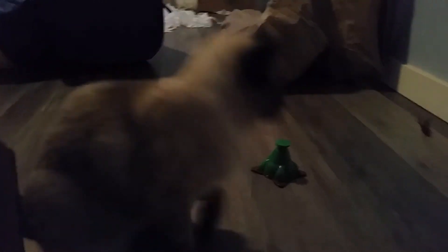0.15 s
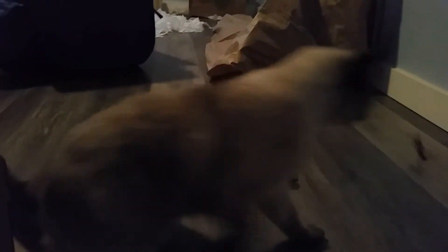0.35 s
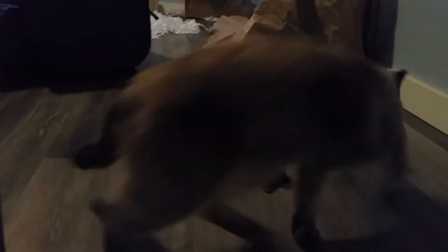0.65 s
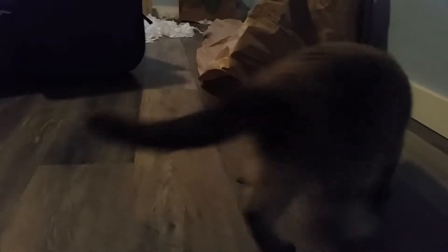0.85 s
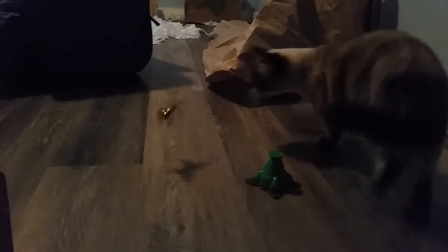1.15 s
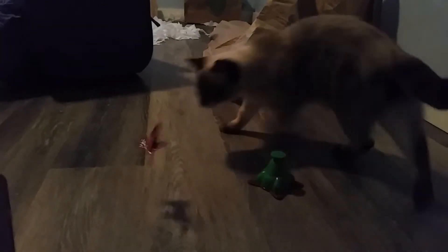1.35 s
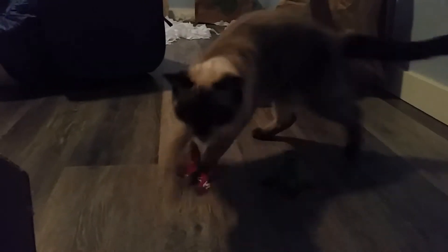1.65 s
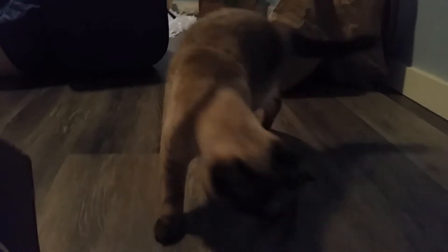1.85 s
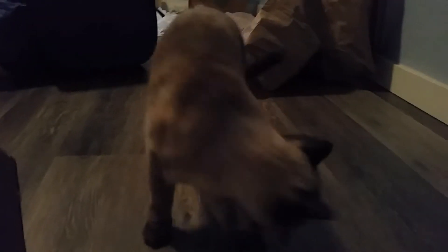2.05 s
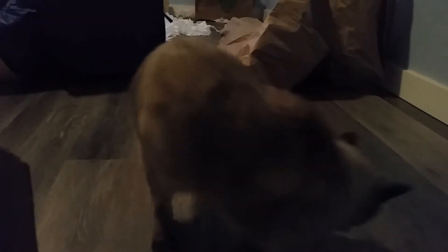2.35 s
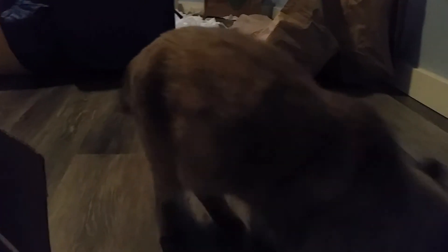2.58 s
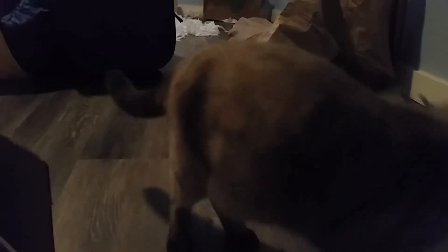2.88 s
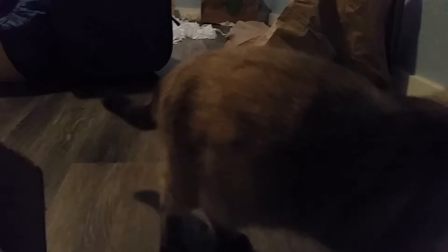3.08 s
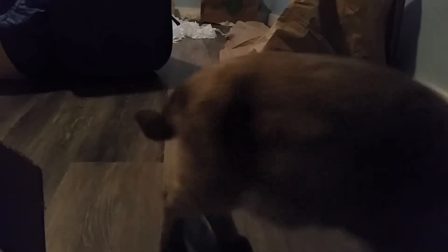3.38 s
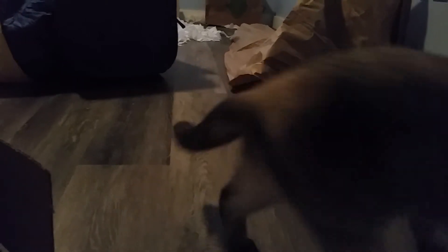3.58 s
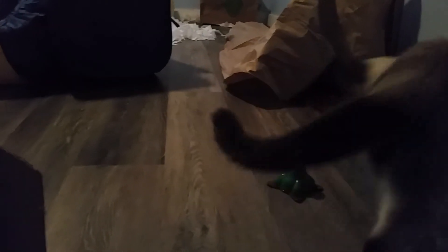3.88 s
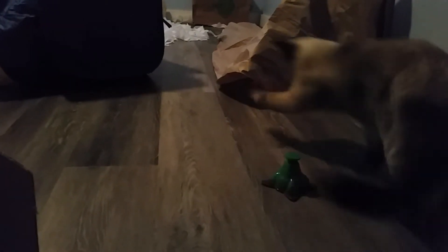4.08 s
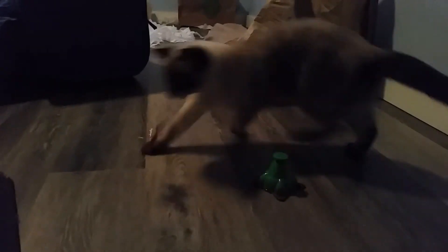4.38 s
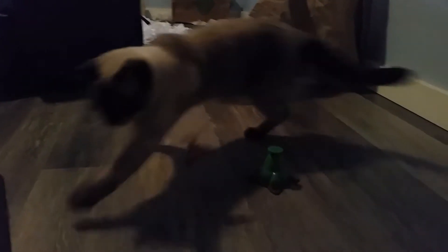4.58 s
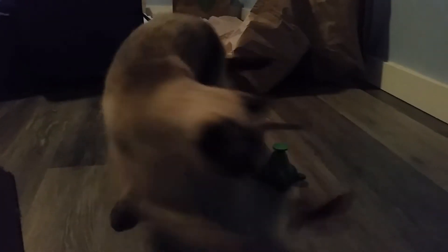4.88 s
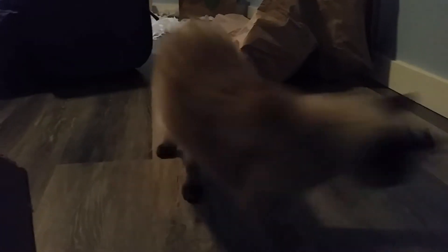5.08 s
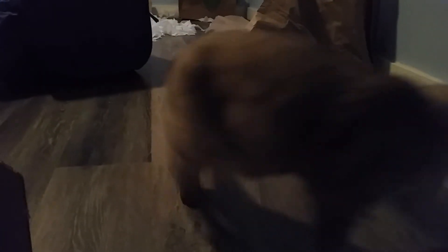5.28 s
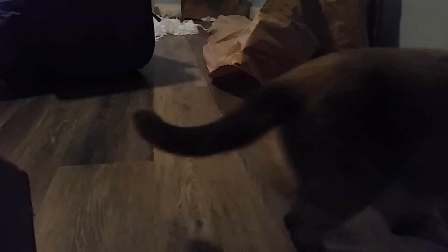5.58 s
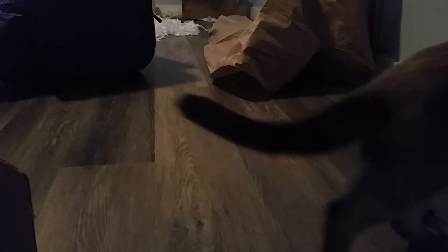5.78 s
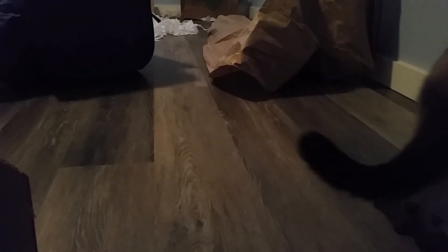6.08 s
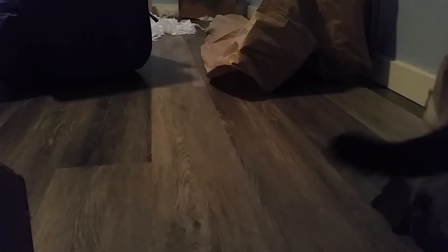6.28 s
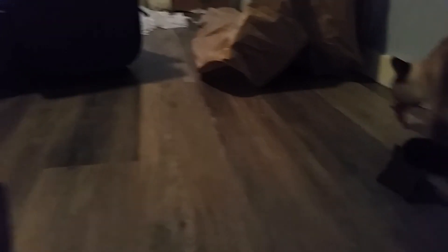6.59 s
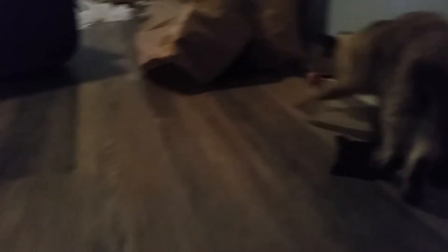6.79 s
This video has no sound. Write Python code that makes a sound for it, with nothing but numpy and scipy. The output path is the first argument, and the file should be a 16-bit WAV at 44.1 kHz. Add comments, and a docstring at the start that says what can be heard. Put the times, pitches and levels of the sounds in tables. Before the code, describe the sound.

Close hand-held stereo pickup of a cat playing indoors on hard boards. A tiny paw squeak and toy rustle come first, then scattered crisp bats and clicks of claws, with quieter shuffling between. A burst of cracking, buckling paper is the loudest event, ringing in the room; a few taps, paper scraping, lens clicks and dull bumps on the camera body end it.

```python
"""Bare, ringing room with a wooden floor: a cat chases a crinkly toy, then pounces into paper bags and pushes along them.
Toy and paper are runs of tiny random snaps through filters; claws and pads are decaying noise bursts; a paw squeaks.
A hand-held camera adds finger bumps (gliding low tones) and lens motor ticks (short pings) over a buzzing mount.
Shaped noise is the room air, a wavering sine the faint hum of an appliance; loud passages turn the gain down."""
import sys
import numpy as np
from scipy import signal
from scipy.fft import rfft, irfft, next_fast_len
from scipy.io import wavfile
from scipy.ndimage import uniform_filter1d, minimum_filter1d, map_coordinates

SR = 44100
rng = np.random.default_rng(int(sys.argv[2]) if len(sys.argv) > 2 else 0)


def master_out(mix):
    """Clip the mix to full scale and print it as 16-bit PCM to the path in sys.argv[1]."""
    frames = np.transpose(np.atleast_2d(mix))
    ceiling = np.clip(frames, -1, 1)
    pcm = np.round(ceiling * 32767).astype(np.int16)
    wavfile.write(sys.argv[1], SR, pcm)


N = 306054

# Levels in the event tables are relative; each source trims them. claws tick on the boards: (time [s], level
# [dB], wood trim [dB])
CLAW_TICKS = [(0.4108, -34, -8), (0.5764, -21.5, -8), (1.6926, -37.5, -6), (1.783, -23, -8),
              (1.8494, -15, -13), (2.188, -24, -13.5), (4.4423, -27.5, -2), (4.7468, -19.5, -25),
              (4.8051, -36.5, 5), (4.8463, -21.5, 2), (5.009, -30, -13), (5.3498, -19, -14),
              (5.4177, -9, -2), (6.1364, -26.5, -19)]
# the toy is batted: (time [s], level [dB], wood level relative to it [dB], length [s])
TOY_BATS = [(.562, -19.5, -7, 0.0075), (.621, -22, -7.5, 0.016), (1.859, -9, -11.5, 0.0082),
            (2.221, -18, -13, .012), (2.511, -26, -7.5, 0.012), (3.229, -26.5, -6, 0.027),
            (4.754, -29.5, -20, .019), (5.322, -27.5, -10, 0.036), (5.349, -10, -16, .03),
            (5.583, -13.5, -9, 0.024), (5.656, -25, -23, 0.11), (6.223, -24.5, 2, 0.018),
            (6.253, -19, -2, 0.014), (6.357, -20.5, -5.5, 0.023)]
# blows on the bags, toy under the paws: (time [s], paper level [dB], toy level [dB], length [s])
BAG_BLOWS = [(5.235, -22, -26, 0.02), (5.358, -5, -31, 0.0069), (5.417, -2, -4, 0.0092),
             (5.453, -2, -5.5, 0.0096), (5.464, -3.5, -19, 0.0086), (6.511, -10, -38, .012)]
# fingers bump the camera body: (time [s], level [dB])
FINGER_BUMPS = [(1.247, -19), (4.137, -37), (4.145, -25.5), (4.315, -28.5), (4.346, -19.5), (4.414, -28),
                (4.506, -19), (6.673, -19.5), (6.724, -14), (6.744, -13.5), (6.765, -15.5), (6.791, -15)]
# runs of lens motor steps: (start [s], end [s], mid-run level [dB])
MOTOR_RUNS = [(.047, 0.679, -46), (0.931, 1.457, -48), (1.47, 1.837, -52), (2.342, 2.604, -48.5),
              (2.789, 3.244, -46), (3.457, 3.755, -45), (4.086, 4.471, -45.5), (4.54, 4.943, -52),
              (5.001, 5.31, -49)]
# harder jolts of the lens: (time [s], level [dB])
MOTOR_JOLTS = [(.336, -39), (2.341, -38.5), (2.388, -33.5), (2.915, -31), (3.033, -35), (3.113, -34),
               (3.581, -28.5), (4.292, -38), (4.823, -32.5), (5.24, -24.5), (6.517, -15), (6.584, -23),
               (6.651, -14.5), (6.699, -19), (6.751, -12), (6.857, -17), (6.928, -19)]
# a paw pad squeaks on the boards: (time [s], pitch [Hz], level [dB])
PAD_SQUEAK = [(.18, 1188, -62), (.195, 1200, -46), (.23, 1405, -45.5), (.25, 1646, -47), (.28, 1716, -52),
              (.295, 1740, -73)]
# soft pads land on the boards: (time [s], level [dB])
PAD_LANDINGS = [(2.027, -40.5), (2.118, -39), (2.139, -42.5), (2.22, -40.5), (2.543, -39.5), (3.736, -37.5),
                (3.882, -38.5), (4.213, -33), (4.577, -33.5), (4.732, -39), (5.037, -34.5)]
# the toy skids over the boards: (time [s], level [dB], length [s])
TOY_SKIDS = [(.492, -27, 0.0066), (0.517, -37, 0.028), (0.986, -39, 0.022), (1.767, -32, 0.0082),
             (3.052, -36.5, 0.052), (4.441, -30.5, 0.0072), (4.608, -33, 0.018), (4.804, -27.5, 0.0032),
             (5.199, -31.5, 0.018)]
# the cat sweeps the toy over the floor: (start [s], end [s], toy rustle level [dB], paw scuff level [dB])
FLOOR_SWIPES = [(0.0, .54, -51.5, -55), (.56, .65, -42, -41), (.98, 1.76, -56, -53), (2.22, 2.52, -32, -48),
                (2.7, 3.0, -49, -46), (3.0, 3.17, -48, -45), (3.54, 3.7, -43.5, -45.5),
                (4.08, 4.43, -46.5, -50), (4.52, 4.88, -44.5, -49), (5.14, 5.3, -42.5, -41.5)]
# the cat pushes along the bags: (start [s], end [s], toy rustle level [dB], paper level [dB])
BAG_SHOVES = [(6.24, 6.37, -33, -55), (6.385, 6.53, -37.5, -26.5), (6.54, 6.93, -40, -30.5)]

# modes of the bags and floor: (frequency [Hz], width [Hz], level [dB])
HOLLOW_MODES = [(550, 85, -2.5), (840, 58, 4), (1125, 58, 2.5), (1550, 72, -19), (1930, 69, -15),
                (2420, 46, -1.5)]
# modes of the toy's light shell: (frequency [Hz], width [Hz], level [dB])
SHELL_MODES = [(1840, 400, -0.5), (2510, 410, -2.5), (3000, 590, -5.5)]
# spectrum of the foil and claw ticks: (frequency [Hz], relative density [dB])
TOY_SPECTRUM = [(300, -20), (2000, -17.5), (4000, -12.5), (7500, -13.5), (9500, -1), (11000, 3),
                (13500, -4.5), (16000, -0.5)]
# spectrum of the boards: (frequency [Hz], relative density [dB])
WOOD_SPECTRUM = [(100, -19), (300, -5), (600, 1.5), (1100, 0.5), (2500, -1.5), (3500, -8.5), (7000, -14.5),
                 (16000, -8)]
# spectrum of struck paper: (frequency [Hz], relative density [dB])
PAPER_SPECTRUM = [(80, -44), (150, -23.5), (300, -18.5), (420, -7.5), (560, -4.5), (700, -9), (880, -1.5),
                  (1400, -2.5), (1950, -2.5), (2600, -4.5), (3300, -14.5), (4200, -19.5), (7800, -25.5),
                  (12000, -32)]
# spectrum of scraped paper: (frequency [Hz], relative density [dB])
SCRAPE_SPECTRUM = [(150, -15), (300, -15.5), (530, -6), (690, -11), (850, -1), (1200, -8.5), (1600, -9),
                   (2550, -8.5), (3100, -17), (4000, -20), (6900, -29.5), (12000, -43)]
# spectrum of a pad landing: (frequency [Hz], relative density [dB])
PAD_SPECTRUM = [(60, -1), (250, -8), (600, 0), (1200, -6.5), (2000, -28), (8000, -27)]
# spectrum of the room air: (frequency [Hz], relative density [dB])
AIR_SPECTRUM = [(24, -27), (54, 4), (70, 1.5), (100, -1.5), (150, -5.5), (210, -3), (320, -12), (540, -8.5),
                (1150, -17.5), (2600, -19), (3300, -25.5), (5000, -24), (7800, -36), (9300, -28),
                (10300, -16), (16000, -25)]
# correlation of the two microphone ports, capped in use: (frequency [Hz], correlation [1])
PORT_CORRELATION = [(40, 0.99), (130, 0.9), (300, 0.86), (640, 0.82), (1400, 0), (3000, 0.022)]
# colour of the ports: (frequency [Hz], left minus right [dB])
PORT_TILT = [(100, 0), (700, -3), (1300, -4), (2400, -5), (3200, 1.5), (4400, 7.5), (6300, 4), (8300, -9.5),
             (10500, -13), (12500, 2), (15000, 2)]
# reverberation of the room: (frequency [Hz], T60 [s])
ROOM_T60 = [(150, 0.72), (600, 0.56), (2000, 0.65), (5000, 0.56), (11000, 0.36), (16000, 0.22)]

AIR_DB, TOP_HZ = -48, 16000
# the struck bag goes on buckling, ever more weakly
COLLAPSE_START_S, COLLAPSE_END_S, COLLAPSE_DB, COLLAPSE_FADE_DB_PER_S = 5.494, 5.607, -5, 52
BUCKLE_GAP_S, BUCKLE_LENGTH_S, BUCKLE_TOY_DB = 0.018, 0.0097, -13.5
STROKE_ATTACK_S, STROKE_SAG_DB_PER_S, STROKE_RELEASE_S = 0.027, 3, 0.015
LENS_STEP_S = 0.0411  # a weaker step falls halfway between
LENS_EDGE_DB = -6  # ends of a run relative to its middle
LENS_IDLE_DB = -57  # mount buzz between runs, before its trim
LENS_PAN_DB = 7.5  # left minus right: the lens sits nearer the left port
SWING_START_S, SWING_ATTACK_S, SWING_DB = 6.376, 0.0069, -29
DUCK_ABOVE_DB, DUCK_MAX_DB, DUCK_HOLD_S, DUCK_GLIDE_S = -23.5, 3, 0.7, 0.043


def amp(db):
    """Decibels to gain."""
    return 10 ** (np.asarray(db) / 20)


def unit(x):
    """Scale to rms 1."""
    return x / np.sqrt(np.mean(x ** 2) + 1e-20)


def along(points, hz):
    """(Hz, value) points read on a log frequency axis."""
    f, v = np.transpose(points)
    return np.interp(np.log(hz + 1), np.log(f), v)


def gains(rows):
    """Each dB column as a gain per sample, -120 dB outside the curve."""
    s, *cols = np.transpose(rows)
    t = np.arange(N) / SR
    return [amp(np.interp(t, s, c, left=-120, right=-120)) for c in cols]


def wobble(rate_hz):
    """Smooth random curve with rate_hz knots a second."""
    knots = rng.standard_normal(int(N * rate_hz / SR) + 4)
    return map_coordinates(knots, [np.arange(N) * rate_hz / SR])


def add(track, s, sound):
    """Mix a sound into a track at time s."""
    start = max(round(s * SR), 0)
    part = track[start:start + len(sound)]
    part += sound[:len(part)]


def filtered(x, response):
    """Apply a complex response of frequency to x."""
    m = next_fast_len(N + SR // 2)
    return irfft(rfft(x, m) * response(np.fft.rfftfreq(m, 1 / SR)), m)[..., :N]


def coloured(x, spectrum, size=4096):
    """Minimum-phase filter of unit energy with the given spectrum."""
    cepstrum = irfft(np.log(amp(along(spectrum, np.fft.rfftfreq(size, 1 / SR)))))
    cepstrum[1:size // 2] *= 2
    cepstrum[size // 2 + 1:] = 0
    kernel = irfft(np.exp(rfft(cepstrum)))
    return signal.fftconvolve(x, kernel / np.linalg.norm(kernel))[:N]


def resonance(f, hz, width_hz):
    """Response of one damped mode."""
    return 1j * f * width_hz / (hz * hz - f * f + 1j * f * width_hz)


def modes(f, rows, sign=1):
    """Sum of damped modes; sign -1 alternates their polarity."""
    return sum(sign ** k * amp(db) * resonance(f, hz, width) for k, (hz, width, db) in enumerate(rows))


def at_ports(pair):
    """Two unrelated signals become left and right, most alike in the bass."""
    def mid_side(f):
        turn = np.arccos(np.clip(along(PORT_CORRELATION, f), 0, 0.97)) / 2
        return np.array([np.cos(turn), np.sin(turn)])
    mid, side = filtered(pair, mid_side)
    return np.array([mid + side, mid - side])


def creases(rate_hz, spread_db):
    """Tiny snaps at random times with random signs and sizes, rms 1."""
    sizes = rng.choice([-1, 1], N) * amp(spread_db * np.clip(rng.standard_normal(N), -2, 2))
    return unit(sizes * (rng.random(N) < rate_hz / SR))


def burst(snaps, s, length_s):
    """A run of snaps that starts at once and gives out along a half-Gaussian."""
    t = np.arange(SR // 5) / SR
    shape = np.exp(-(t / max(length_s, 0.002)) ** 2)
    run = np.roll(snaps, -round(s * SR))[:len(t)] * shape
    return run * np.linalg.norm(shape) / (np.linalg.norm(run) + 1e-9)


def strokes(rows):
    """One gain per sample for each dB column: every paw stroke builds up, slackens and dies away."""
    t, total = np.arange(N) / SR, 0
    for start, end, *levels in rows:
        rise = np.clip((t - start) / STROKE_ATTACK_S, 0, 1)
        sag = amp(-STROKE_SAG_DB_PER_S * np.maximum(t - start, 0))
        release = np.exp(-np.maximum(t - end, 0) / STROKE_RELEASE_S)
        total = total + np.outer(amp(levels), rise * sag * release)
    return total


def bag_hits():
    """Blows, then uneven buckles: (time [s], paper level [dB], toy level [dB], length [s])."""
    times = np.arange(COLLAPSE_START_S, COLLAPSE_END_S, BUCKLE_GAP_S)
    levels = COLLAPSE_DB - COLLAPSE_FADE_DB_PER_S * (times - COLLAPSE_START_S)
    late = BUCKLE_GAP_S * rng.uniform(-0.25, 0.25, size=64)
    buckles = [(s + dt, db, db + BUCKLE_TOY_DB, BUCKLE_LENGTH_S) for s, dt, db in zip(times, late, levels)]
    return list(BAG_BLOWS) + buckles


def room(x, direct_db, early_db, tail_db, early_t60_s=0.049):
    """Direct sound, quick reflections from floor and wall, and a tail decaying at its own rate per band."""
    hz, t, z = signal.stft(rng.standard_normal((2, SR)), SR, nperseg=256)
    decay = amp(-60 * t / along(ROOM_T60, hz)[:, None])
    tail = signal.istft(z * decay, SR, nperseg=256)[1][:, :SR]
    t = np.arange(SR) / SR
    tail *= 1 - np.exp(-t / 0.0056)
    sparse = rng.standard_normal((2, SR)) * (rng.random((2, SR)) < 0.12)
    early = sparse * amp(-60 * t / early_t60_s)
    walls = sum(amp(db) * part / np.linalg.norm(part, axis=1, keepdims=True)
                for db, part in [(early_db, early), (tail_db, tail)])
    # treble scatters round the camera body, so the ports hear it out of step
    scattered = filtered(x, lambda f: np.exp(-2j * np.pi * (f / 2200) ** 1.4))
    reflected = signal.fftconvolve(x[None], walls, axes=1)[:, :N]
    return at_ports(amp(direct_db) * np.array([x, scattered]) + reflected)


def background():
    """Room air as steady shaped noise; an appliance hums as a sine wavering in pitch and level."""
    noise = filtered(rng.standard_normal((2, N)), lambda f: amp(along(AIR_SPECTRUM, f)))
    air = at_ports(unit(noise))
    phase = 2 * np.pi * np.cumsum(119 + 0.76 * wobble(5)) / SR
    hum = amp(-53.5 + 0.91 * wobble(13.0)) * np.sin(phase)
    return amp(AIR_DB) * air + hum


def toy(hits, bag_wood_db=-8):
    """Each bat of the paw buckles the foil in a burst of snaps; it rustles while pushed about."""
    snaps = creases(rate_hz=3500, spread_db=6.5)
    foil, boards = np.zeros((2, N))
    in_bags = [(s, db, bag_wood_db, length) for s, _, db, length in hits]
    for s, db, wood_db, length in list(TOY_BATS) + in_bags:
        crackle = amp(db - 6.5) * burst(snaps, s, length)
        add(foil, s, crackle)
        add(boards, s, amp(wood_db) * crackle)
    rustle = amp(-7) * strokes(FLOOR_SWIPES)[0] + amp(4) * strokes(BAG_SHOVES)[0]
    foil += rustle * amp(4 * wobble(45)) * creases(rate_hz=1900, spread_db=5)
    return coloured(foil, TOY_SPECTRUM) + coloured(boards, WOOD_SPECTRUM)


def paws():
    """Pads scuff over the grain: snaps under an uneven stroke gain, coloured by the boards."""
    stroke = amp(-4.5) * strokes(FLOOR_SWIPES)[1]
    scuff = stroke * amp(3.0 * wobble(30)) * creases(rate_hz=3000, spread_db=7.0)
    return coloured(scuff, WOOD_SPECTRUM)


def lens(ring_hz=905, swell_s=0.0039, between_db=-5.5, scatter_db=1.7):
    """Motor steps and jolts ping; the spring mount buzzes as it works and when the camera swings."""
    steps, jolts, drive = np.zeros((3, N))
    t = np.arange(-SR // 80, SR // 80) / SR
    seconds = np.arange(N) / SR

    def ping():
        cycles = ring_hz * rng.normal(1, 0.0093) * t + rng.random()
        return np.exp(-(t / swell_s) ** 2) * np.sin(2 * np.pi * cycles)

    buzz = unit(filtered(creases(rate_hz=600, spread_db=0), lambda f: resonance(f, 880, width_hz=290) ** 2))
    rattle = unit(filtered(creases(rate_hz=400, spread_db=0.5), lambda f: resonance(f, 890, width_hz=510) ** 2))
    for s, db in MOTOR_JOLTS:
        add(jolts, s + t[0], amp(db) * ping())
    for start, end, db in MOTOR_RUNS:
        arch = np.linspace(-1, 1, round((end - start) * SR)) ** 2
        add(drive, start + t[0], amp(db + LENS_EDGE_DB * arch))
        for k, s in enumerate(np.arange(start, end, LENS_STEP_S / 2)):
            step_db = between_db * (k % 2) + scatter_db * rng.standard_normal()
            add(steps, s + t[0], amp(step_db) * ping())
    swing = amp(SWING_DB) * np.clip((seconds - SWING_START_S) / SWING_ATTACK_S, 0, 1)
    idle = amp(LENS_IDLE_DB + 1.5 * wobble(5.7)) * (seconds < MOTOR_RUNS[-1][1])
    stepping = amp(10.2) * drive * steps
    mount = amp(-6) * np.maximum(drive, idle) * buzz
    return stepping + mount + swing * amp(1.86 * wobble(40)) * rattle + jolts


def squeak(upper_ratio=1.5, upper_db=-11):
    """A pad squeaks as it slips: a rough rising tone with a faint strand above it."""
    s, hz, db = np.transpose(PAD_SQUEAK)
    pitch_hz = np.interp(np.arange(N) / SR, s, hz) * (1 + 0.018 * wobble(400))
    phase = 2 * np.pi * np.cumsum(pitch_hz) / SR
    tone = np.sin(phase) + amp(upper_db) * np.sin(upper_ratio * phase)
    return amp(4.0) * gains(np.transpose([s, db]))[0] * tone


def claws():
    """Single hard contacts: decaying noise as a bright tick and a knock of the board."""
    tick, knock = np.zeros((2, N))
    t = np.arange(SR // 100) / SR
    for s, db, wood_db in CLAW_TICKS:
        contact = rng.standard_normal(len(t)) * np.exp(-t / 0.0016) * (1 - np.exp(-t / 0.00029))
        add(tick, s, amp(db - 2) * contact)
        add(knock, s, amp(db + wood_db + 3.5) * contact)
    return coloured(tick, TOY_SPECTRUM) + coloured(knock, WOOD_SPECTRUM)


def skids():
    """The toy catches on the grain of the floor and its shell rings."""
    catches, push = creases(rate_hz=2500, spread_db=-2), np.zeros(N)
    for s, db, length in TOY_SKIDS:
        add(push, s, amp(db + 4) * burst(catches, s, length))
    return filtered(push, lambda f: modes(f, SHELL_MODES, sign=-1))


def bump(t, low_hz, glide_hz, rise_s):
    """One soft push on the case: a low tone whose pitch falls to low_hz as it dies."""
    cycles = low_hz * t + glide_hz * rise_s * (1 - np.exp(-t / rise_s))
    return (t / rise_s) ** 2 * np.exp(2 - 2 * t / rise_s) * np.cos(2 * np.pi * cycles)


def fingers():
    """Bumps of the hand reach the right port harder and a little quicker."""
    left, right = np.zeros((2, N))
    t = np.arange(SR // 25) / SR
    for s, db in FINGER_BUMPS:
        add(left, s, amp(db - 0.5) * bump(t, low_hz=102, glide_hz=195, rise_s=0.0035))
        add(right, s, amp(db + 3.5) * bump(t, low_hz=126, glide_hz=254, rise_s=0.0027))
    return np.array([left, right])


def pats():
    """A pad lands softly: decaying noise as a dull knock of the board without any tick."""
    pushes = np.zeros(N)
    t = np.arange(SR // 25) / SR
    for s, db in PAD_LANDINGS:
        add(pushes, s, amp(db - 2.5) * rng.standard_normal(len(t)) * np.exp(-t / 0.0085))
    return coloured(pushes, PAD_SPECTRUM)


def bags(hits):
    """Stiff paper cracks and buckles under the pounce, then scrapes; the hollow bags colour both."""
    snaps, blows = creases(rate_hz=1600, spread_db=6), np.zeros(N)
    for s, db, _, length in hits:
        add(blows, s, amp(db - 6.5) * burst(snaps, s, length))
        add(blows, s, amp(db + 3.0) * np.ones(1))  # the first fold gives way at once
    shove = amp(3.5) * strokes(BAG_SHOVES)[1]
    scrape = shove * amp(2.3 * wobble(50)) * creases(rate_hz=1200, spread_db=6)
    paper = coloured(blows, PAPER_SPECTRUM) + coloured(scrape, SCRAPE_SPECTRUM)
    ring = filtered(paper, lambda f: modes(f, HOLLOW_MODES))
    return amp(-4.5) * paper + amp(-6) * ring


def gain_control(x):
    """Loud passages turn the gain down a little; it holds, then glides back."""
    power = np.abs(uniform_filter1d(np.mean(x ** 2, axis=0), SR // 25))
    level_db = 10 * np.log10(power + 1e-12)
    hold = round(DUCK_HOLD_S * SR)
    duck_db = np.clip(DUCK_ABOVE_DB - level_db, -DUCK_MAX_DB, 0)
    gain_db = minimum_filter1d(duck_db, hold, origin=(hold - 1) // 2)
    return x * amp(uniform_filter1d(gain_db, round(DUCK_GLIDE_S * SR)))


def scene():
    """The play in the room, with the camera's own small noises close by."""
    hits = bag_hits()
    crackle = room(toy(hits), direct_db=-7, early_db=-3.0, tail_db=-2.5)
    steps = room(paws() + pats(), direct_db=-1, early_db=-3.5, tail_db=-5.5)
    motor = lens() * amp(LENS_PAN_DB * np.array([[0.5], [-0.5]]))
    slip = room(squeak(), direct_db=-4.5, early_db=-5, tail_db=-6.5)
    ticks = room(claws(), direct_db=-0.5, early_db=-8.5, tail_db=-3.5)
    sliding = room(skids(), direct_db=-2.5, early_db=1, tail_db=-0.5)
    paper = room(bags(hits), direct_db=-2.0, early_db=1, tail_db=1.5)
    return background() + crackle + steps + motor + slip + ticks + sliding + fingers() + paper


def record(dry):
    """Gain ducks on loud sounds; each port has its own colour; nothing is kept above TOP_HZ."""
    def port_response(f):
        tilt = amp(np.array([[0.5], [-0.5]]) * along(PORT_TILT, f))
        return tilt / np.sqrt(np.mean(tilt ** 2, axis=0)) * (f < TOP_HZ)
    return filtered(gain_control(dry), port_response)


dry = scene()
out = record(dry)
master_out(out)
```